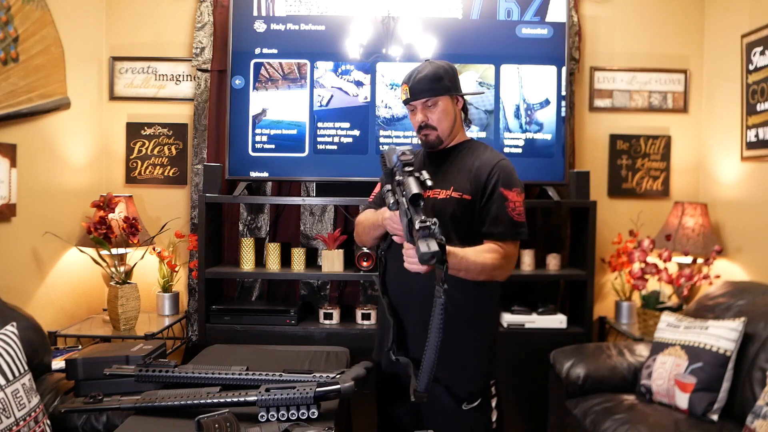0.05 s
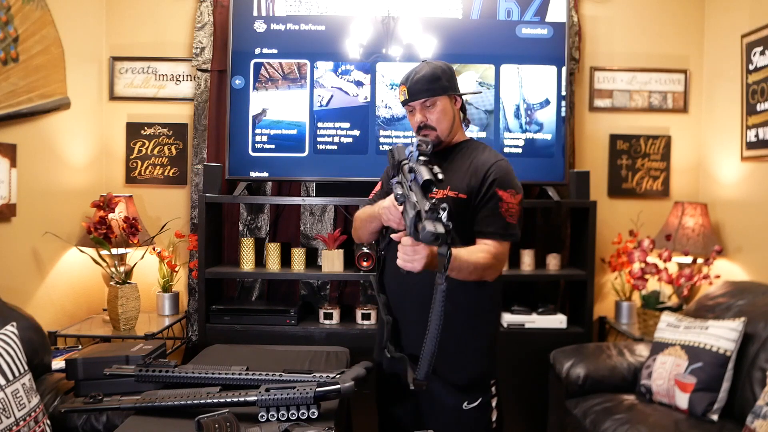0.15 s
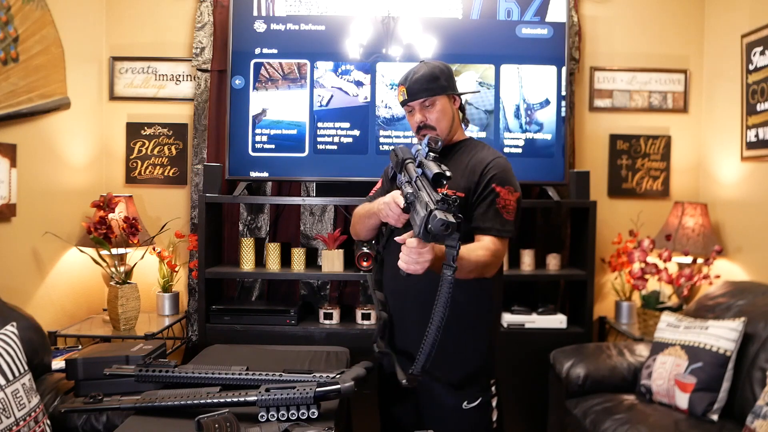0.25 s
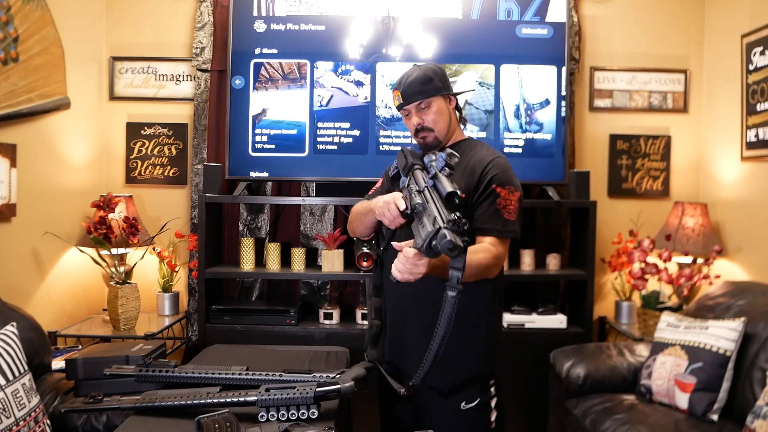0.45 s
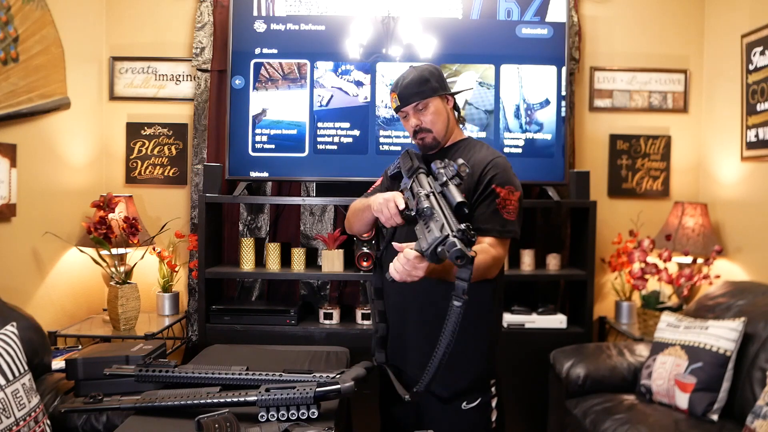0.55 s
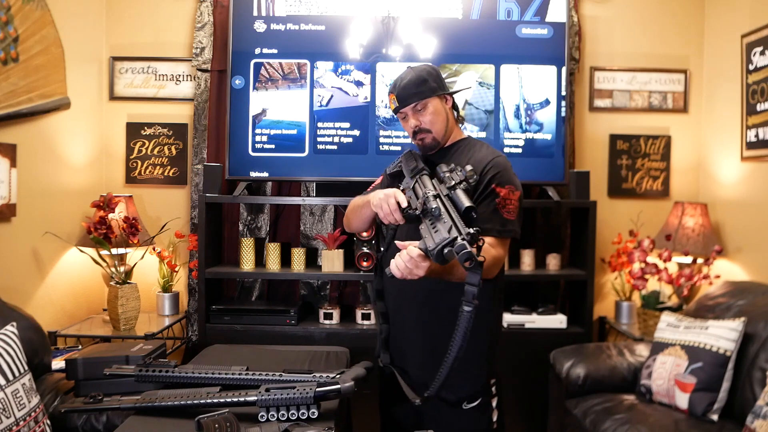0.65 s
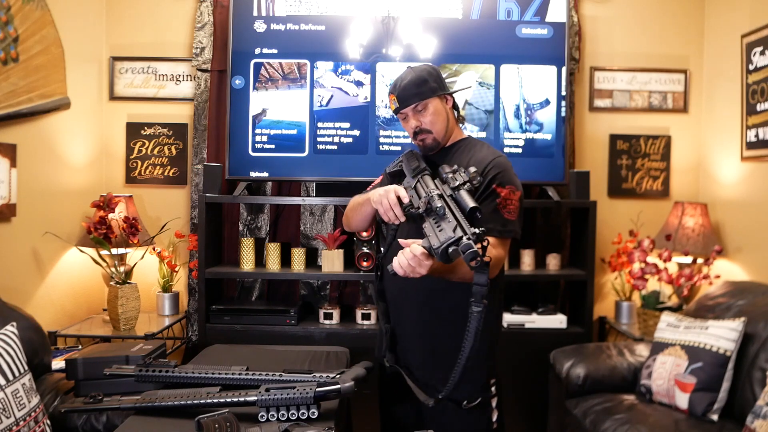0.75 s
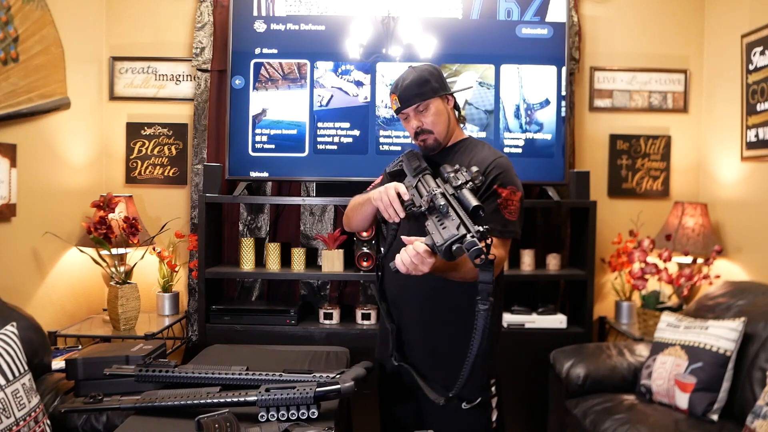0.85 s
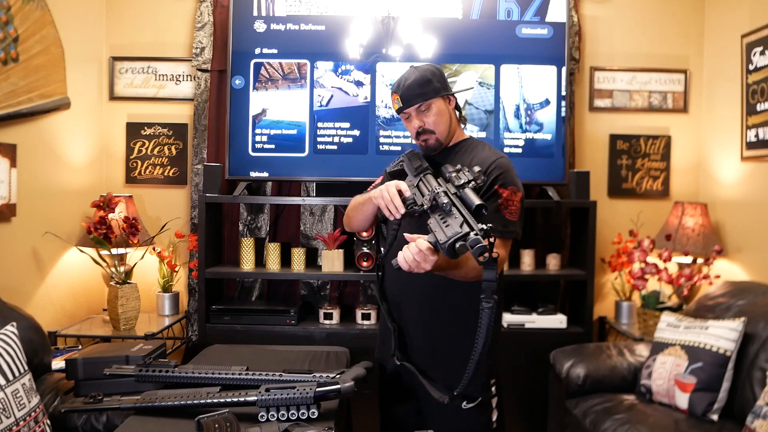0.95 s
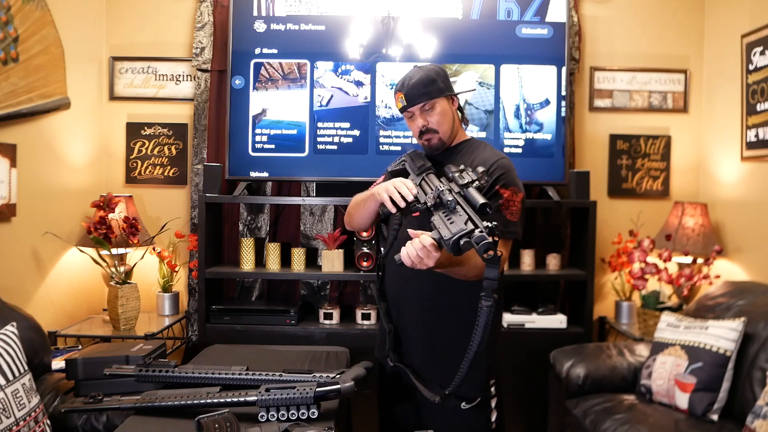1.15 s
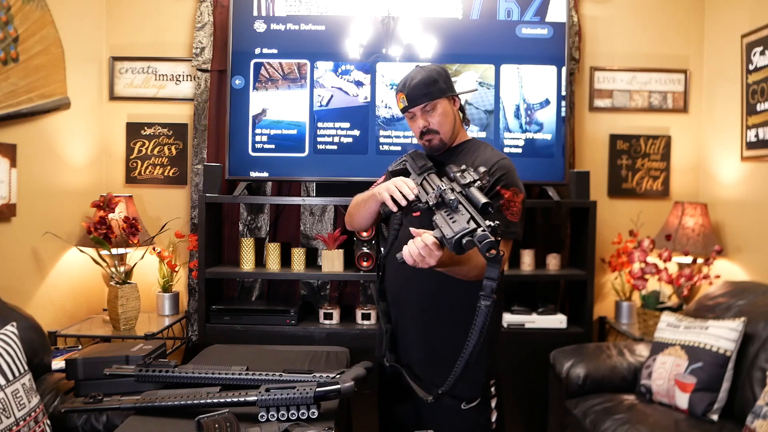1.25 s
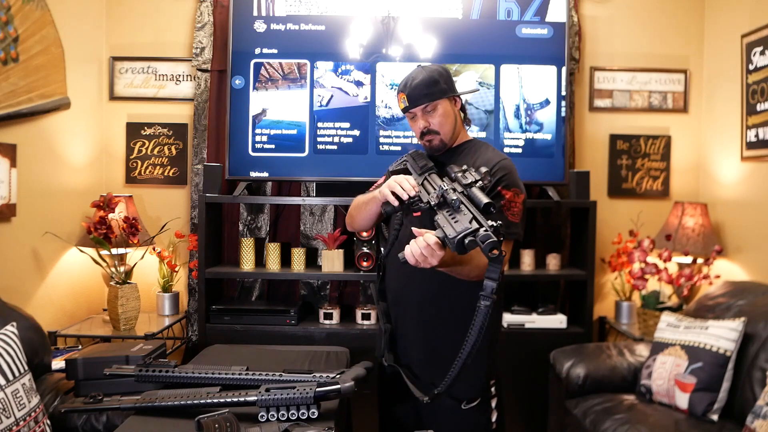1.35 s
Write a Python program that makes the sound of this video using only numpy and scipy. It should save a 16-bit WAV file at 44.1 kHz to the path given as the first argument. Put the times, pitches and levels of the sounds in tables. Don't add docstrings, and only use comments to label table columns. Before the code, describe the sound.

Sharp, loud shotgun racking bursts out early, steel sliding and clacking shut within a fraction of a second; the microphone level ducks and recovers as soft taps and sleeve rustle follow over steady indoor hum.

```python
import sys
import numpy as np
from scipy import signal
from scipy.fft import rfft, irfft, next_fast_len
from scipy.io import wavfile
from scipy.ndimage import map_coordinates

SR = 44100
rng = np.random.default_rng(int(sys.argv[2]) if len(sys.argv) > 2 else 0)


def transcribe(signal):
    frames = np.atleast_2d(signal).T
    limited = np.clip(frames, -1, 1)
    pcm = np.round(limited * 32767).astype(np.int16)
    wavfile.write(sys.argv[1], SR, pcm)


def boost(x):
    u = np.asarray(x, float) / 20
    return 10 ** u


N = 61739

# [t/s, level/dB, ring f/Hz, t60/s]
KNOCKS = [(0.184, -39.5, 3970, 0.036), (0.1927, -29, 2500, .03), (0.1986, -18, 7360, .015),
          (.2180, 3, 5100, .014), (0.221, -9.5, 3300, .016), (0.2334, 1.5, 4000, .013),
          (0.2366, 0.5, 3100, .013), (0.2395, -5.5, 3600, .008), (.2595, -7.5, 4600, .02),
          (0.2784, -11.5, 4200, .025), (0.286, -11, 6500, .025), (.2980, -2.5, 4500, .012),
          (0.3015, -1, 3800, 0.023), (0.3047, -4, 4300, .018), (0.3087, 2.5, 3000, .016)]
# [t/s, level/dB, ring f/Hz, t60/s, hollow level/dB]
TAPS = [(0.0969, -33, 3600, .009, -10), (.1165, -41, 3700, 0.014, 1.5), (0.5738, -34, 2470, 0.022, -7),
        (.5878, -40, 2610, 0.052, -10), (.7175, -52.5, 4500, .015, -20), (.7365, -52.5, 5600, .015, -25),
        (.7590, -49, 5010, 0.017, -12), (.7690, -46.5, 8500, 0.018, -12), (.7805, -49.5, 6000, .025, -9),
        (.9640, -39.5, 720, 0.05, -6), (1.1204, -60, 1508, .02, -8.5), (1.326, -60.5, 1500, .02, -9.5)]
# [t/s, level/dB]
SCRAPE = [(.193, -50), (.2, -25), (.23, -23), (.245, -19), (.27, -20), (.295, -16), (.313, -20),
          (.33, -26.5), (.345, -50)]
# [t/s, level/dB]
RUSTLE = [(.06, -85), (.095, -65), (.13, -62), (.16, -67), (.185, -63.5), (.2, -90), (.56, -90), (.6, -61),
          (.66, -69.5), (.77, -65.5), (.85, -72), (.93, -67.5), (.96, -62), (1.0, -69.5), (1.05, -72.5),
          (1.095, -64), (1.11, -97)]
# [t/s, level/dB]
GAIN = [
    (.2, 0.5),
    (.222, -3.5),
    (.25, -17.5),
    (.35, -26.5),
    (.376, -22.5),
    (.46, -16),
    (.568, -5),
    (.65, -3.5),
    (.98, -0.5),
]
# [t/s, f/Hz]
TUBE_PITCH = [(.1, 946), (.22, 1014), (.28, 930), (.4, 930), (.57, 1080), (.96, 1050)]
# [f/Hz, level/dB per Hz]
STEEL = [(88, -51.5), (200, -23.5), (500, -19), (700, -8.5), (1400, -2), (1900, -9), (3300, 0), (5200, -6),
         (7000, -11.5), (15500, -18.5)]
# [f/Hz, level/dB per Hz]
POLYMER = [(100, -41), (400, -12.5), (700, -1), (1400, 0.5), (2500, -2), (4500, -6), (7000, -16.5),
           (16000, -24)]
# [f/Hz, level/dB per Hz]
CLOTH = [(800, -15.5), (2500, -6.5), (4300, -1), (7000, -11), (14000, -22)]
# [f/Hz, level/dB, t60/s]
RECEIVER = [(882, -49, 0.37), (2660, -47.5, 0.37), (3700, -44, .3), (5100, -59.5, .4)]
# [f/Hz, rms level/dB, phase/rad]
HUM = [(60.2, -45, 2.1), (118, -66.5, 1.0), (181.5, -68, 0.89), (372, -71, 1.2)]
# [f/Hz, level/dB per Hz]
AIR = [(30, 2.5), (90, -3), (160, 1), (400, -5), (600, -10), (1200, -16), (3000, -23.5), (6000, -27.5),
       (16000, -40.5)]
# [f/Hz, t60/s]
ROOM_DECAY = [(200, 0.26), (800, .25), (2000, .23), (4000, .21), (8000, .2), (14000, 0.12)]

TUBE_WIDTH_HZ = 60
SLAM_S = 0.308


def unit(x):
    return x / np.sqrt(np.mean(x ** 2) + 1e-20)


def peak(x):
    return x / np.abs(x).max()


def along(points, hz):
    f, v = np.transpose(points)
    return np.interp(np.log(hz + 1), np.log(f + 1), v)


def curve(rows, s=None):
    return np.interp(np.arange(N) / SR if s is None else s, *np.transpose(rows))


def wobble(rate):
    knots = rng.standard_normal(int(N * rate / SR) + 4)
    return map_coordinates(knots, [np.arange(N) * rate / SR])


def filtered(x, response):
    n = x.shape[-1]
    m = next_fast_len(n + 8192)
    return irfft(rfft(x, m) * response(np.fft.rfftfreq(m, 1 / SR)), m)[..., :n]


def coloured(x, colour):
    return filtered(x, lambda f: boost(along(colour, f)))


def resonance(hz, width_hz):
    return lambda f: 1j * f * width_hz / (hz * hz - f * f + 1j * f * width_hz)


def stereo(mid, side, side_db):
    return mid + boost(side_db) * np.array([side, -side])


def mains_hum():
    t = np.arange(N) / SR
    hum = 0
    for hz, db, phase in HUM:
        level = boost(db + 1.53 * wobble(12))
        hum = hum + np.sqrt(2) * level * np.sin(2 * np.pi * hz * t + phase)
    return hum


def room_air():
    air_db = -61.5
    rumble = unit(filtered(rng.standard_normal(N), lambda f: resonance(67.6, 40)(f) ** 2))
    noise = rng.standard_normal((2, N))
    mid, side = unit(filtered(noise, lambda f: boost(along(AIR, f)) * (f > 22)))
    mid = boost(-59.5) * rumble + boost(air_db + 0.8 * wobble(17)) * mid
    return stereo(mid, side, air_db - 15)


def room(x):
    hz, t, z = signal.stft(rng.standard_normal((2, SR)), SR, nperseg=256)
    fall_db = -60 * t / along(ROOM_DECAY, hz)[:, None]
    next_room = boost(-26.5 + fall_db / 2.2)
    tail = signal.istft(z * (boost(fall_db) + next_room), SR, nperseg=256)[1]
    tail = tail / np.linalg.norm(tail[0])
    late = np.pad(x, (300, 0))[None]
    mid, side = signal.fftconvolve(late, tail, axes=1)[:, :N]
    return boost(-11) * stereo(mid, side, -18)


def sleeve():
    grains = rng.standard_normal(N) * boost(1.8 * wobble(900) + 1.6 * wobble(60))
    return boost(curve(RUSTLE)) * unit(coloured(grains, CLOTH))


def receiver():
    t = np.arange(N) / SR - SLAM_S
    ring = 0
    for hz, db, t60 in RECEIVER:
        mode = resonance(hz, 50 * hz / 1500)
        tone = unit(filtered(rng.standard_normal(N), lambda f: mode(f) ** 2))
        ring = ring + boost(db - 60 * np.abs(t) / t60) * tone
    wash = filtered(rng.standard_normal(N), lambda f: boost(along(STEEL, f)) / (1 + (f / 8000) ** 2))
    ring = ring + boost(-32.5 - 60 * np.abs(t) / 0.24) * unit(wash)
    return boost(12 - curve(GAIN, SLAM_S)) * ring * (t > 0)


def strike(s, db, hz, t60, hollow_db, crack_db, colour, reach):
    rise_s, ring_q, tube_t60 = 0.0006, 2.6, 0.021
    t = np.arange(SR // 12) / SR
    a, b, c = rng.standard_normal((3, len(t))) * (1 - np.exp(-t / rise_s))
    fall = boost(-60 * t / t60)
    broad, narrow = resonance(hz, hz / ring_q), resonance(hz, hz)
    cavity = resonance(curve(TUBE_PITCH, s), TUBE_WIDTH_HZ)
    ring = peak(filtered(a * fall, lambda f: broad(f) * narrow(f) ** 2))
    crack = peak(filtered(b * fall, lambda f: boost(along(colour, f)) / (1 + (f / (reach * hz)) ** 4)))
    tube = peak(filtered(c * boost(-60 * t / tube_t60), lambda f: cavity(f) / (1 + 1j * f / 2000) ** 2))
    onset = np.sin(np.clip(t / rise_s, 0, np.pi / 2)) ** 2
    hit = 0.64 * ring + boost(crack_db) * crack * onset + boost(hollow_db) * tube
    hit = boost(db - curve(GAIN, s)) * hit
    return np.pad(hit, (round(s * SR), N))[:N]


def taps():
    return sum(strike(*row, -2.5, POLYMER, 2.3) for row in TAPS)


def slide_scrape():
    grains = rng.standard_normal(N) * boost(4 * wobble(2500) + 2.5 * wobble(250))
    level = curve(SCRAPE)
    grains = grains * boost(level - curve(GAIN)) * (level > SCRAPE[0][1])
    cavity = resonance(curve(TUBE_PITCH, SLAM_S), TUBE_WIDTH_HZ)
    scrape = unit(coloured(grains, STEEL)) + boost(-9.5) * unit(filtered(grains, cavity))
    return 0.7 * grains.std() * scrape


def slam_thump():
    thump_hz = 110
    u = np.clip(np.arange(N) / SR - SLAM_S, 0, None) * thump_hz * 2 * np.pi
    return boost(-25.5 - curve(GAIN, SLAM_S)) * u * (2 - u) * np.exp(-u)


def steel_knocks():
    return sum(strike(*row, -21, -3, STEEL, 9) for row in KNOCKS)


def scene():
    near = steel_knocks() + taps() + slide_scrape() + slam_thump() + sleeve()
    return near + room(near) + mains_hum() + room_air() + receiver()


def low_pass(x):
    return signal.sosfilt(signal.butter(12, 16470, fs=SR, output="sos"), x)


def record(dry):
    noise = rng.standard_normal((2, N))
    mid, side = unit(filtered(noise, lambda f: np.clip(f, 1500, None) ** -0.2 * (f > 300)))
    x = dry * boost(curve(GAIN)) + boost(-72) * stereo(mid, side, -4.5)
    clip_top, hardness = 0.99, 8
    x = x / (1 + np.abs(x / clip_top) ** hardness) ** (1 / hardness)
    x = filtered(x, lambda f: np.clip((16200 - f) / 700, 0, 1))
    return low_pass(x)


dry = scene()
out = record(dry)
transcribe(out)
```